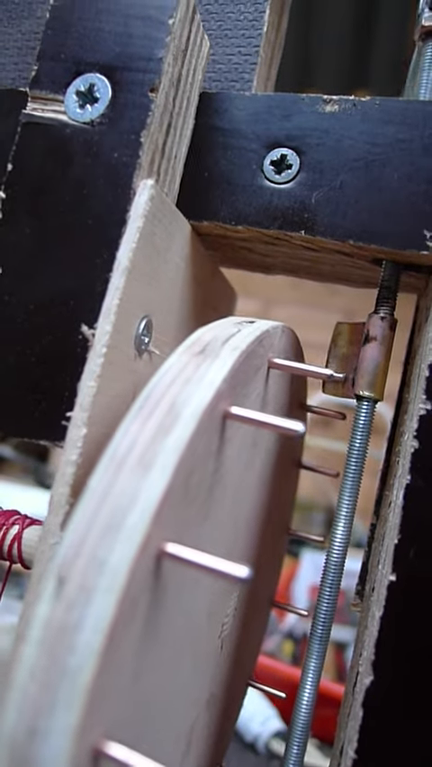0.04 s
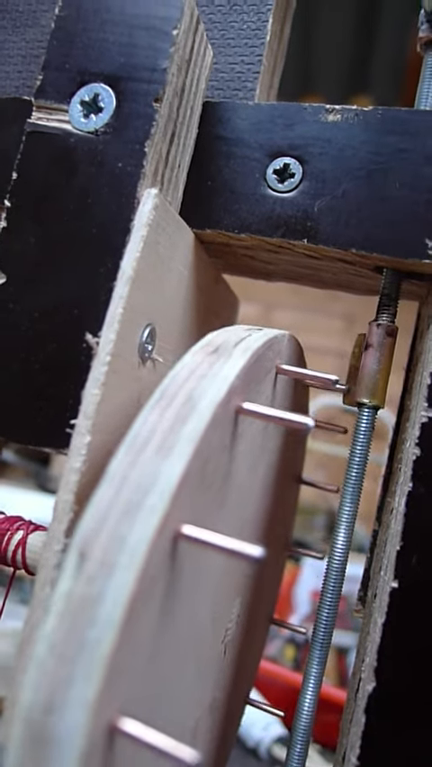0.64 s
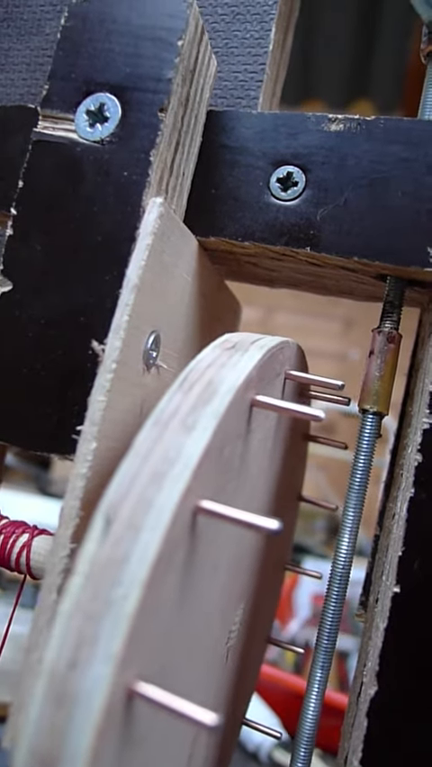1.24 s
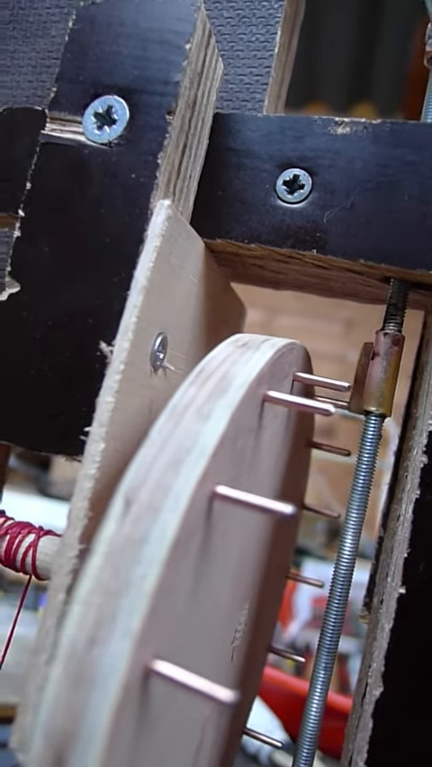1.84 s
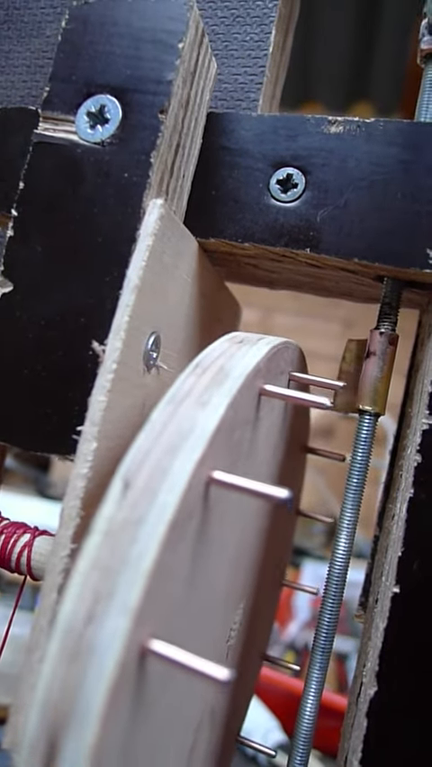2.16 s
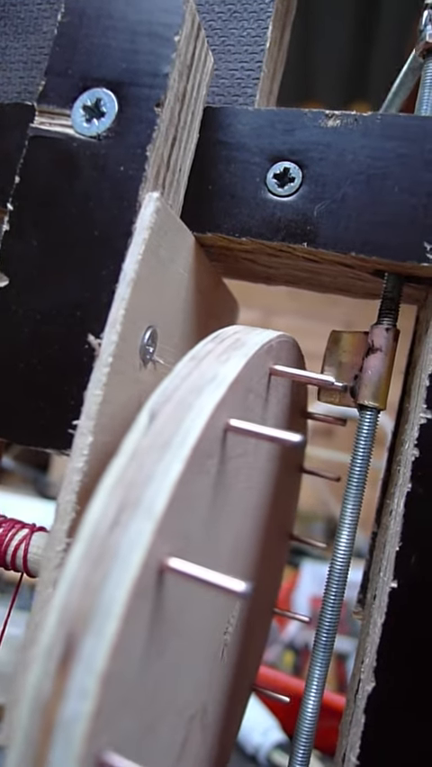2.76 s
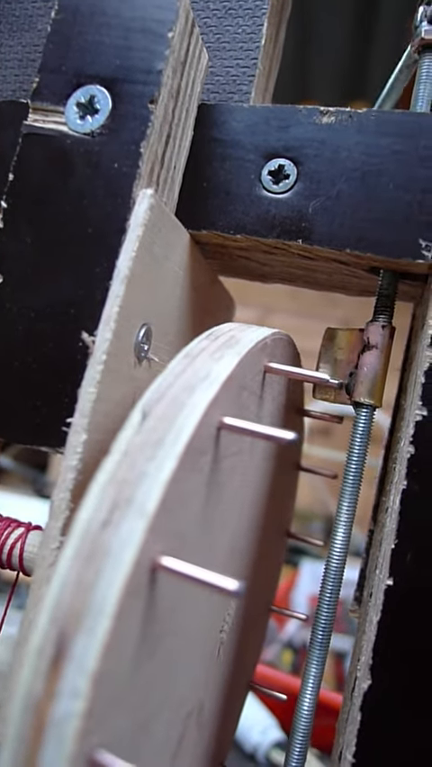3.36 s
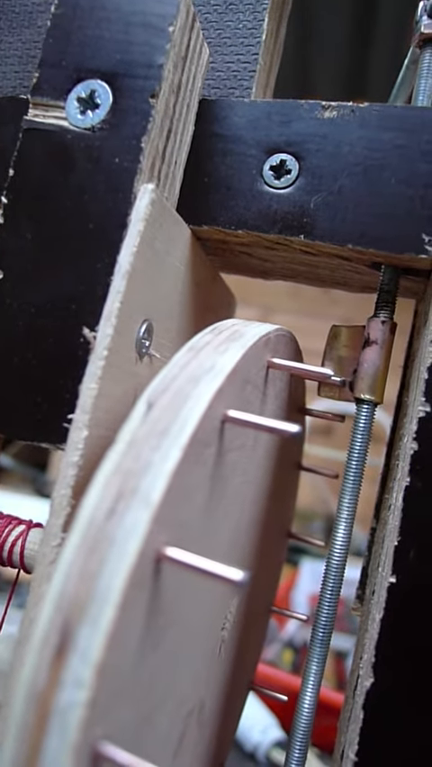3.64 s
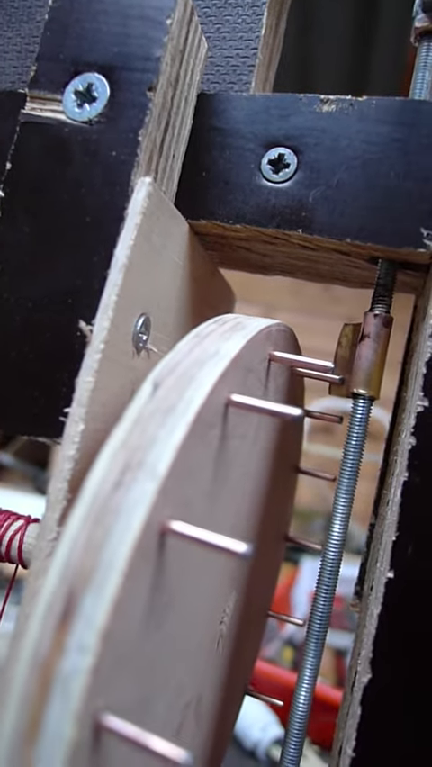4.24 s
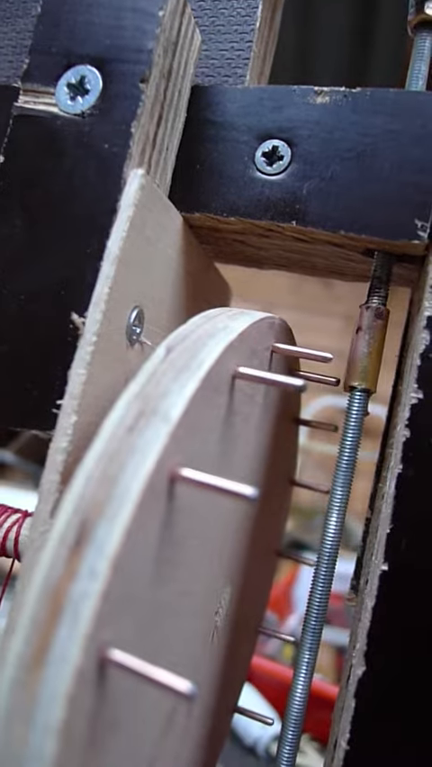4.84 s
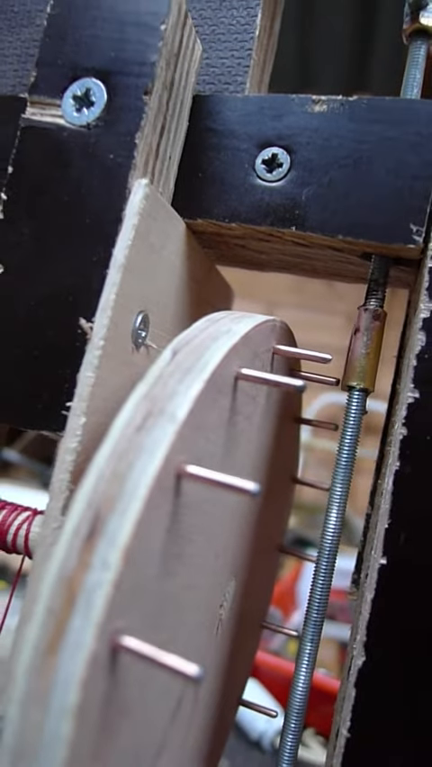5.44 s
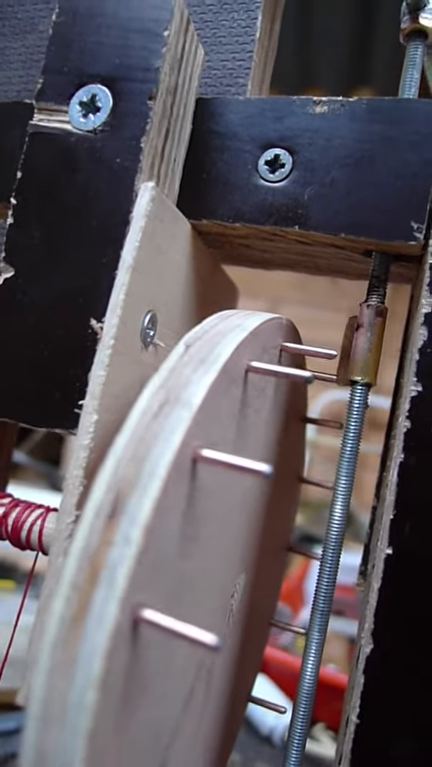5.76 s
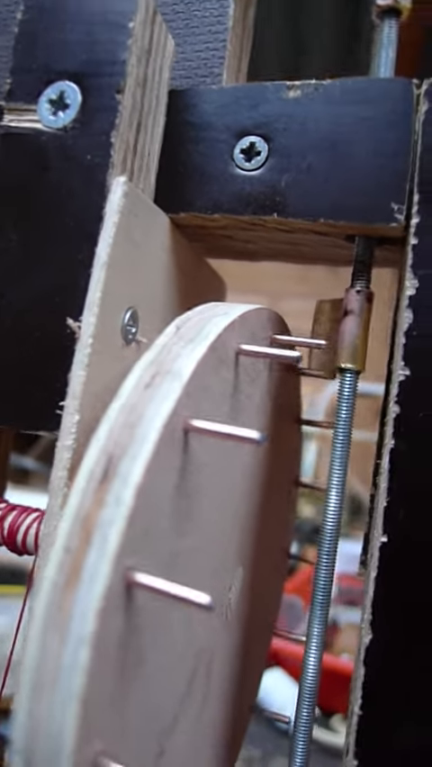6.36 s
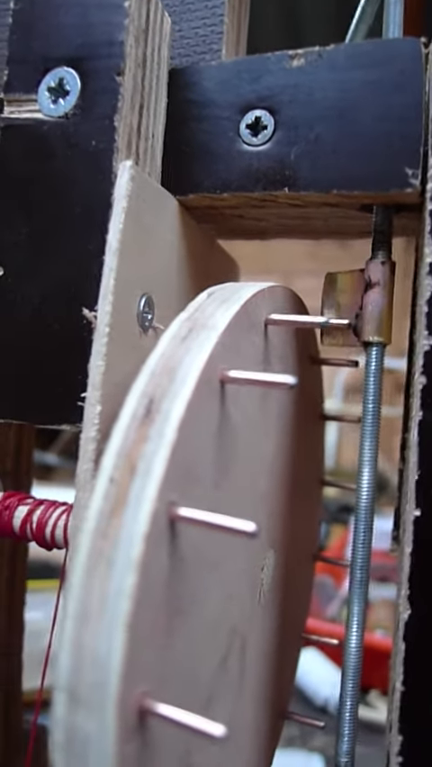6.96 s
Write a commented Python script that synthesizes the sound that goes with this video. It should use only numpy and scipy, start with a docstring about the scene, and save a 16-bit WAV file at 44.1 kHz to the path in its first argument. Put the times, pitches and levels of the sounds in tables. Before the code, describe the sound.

A homemade wooden clock mechanism ticks slowly, heard from close by in a small, quiet room. Four sharp clacks come roughly two seconds apart as steel pins on a plywood wheel strike brass catches. Each is preceded by faint creaks and a brief scrape, and mixes a short metallic ring with a wooden knock and tiny rebounds. Faint hiss lies underneath.

```python
"""Wooden pin-wheel clock

A home-made clock is heard from close by in a quiet room. On each swing a steel pin creaks on a brass
pallet by stick-slip friction, scrapes down its slope and slips off. The plywood wheel spins free for
a moment, then the next pin strikes the other pallet: a chattering clack of steel and wood modes."""
import sys
import numpy as np
from scipy import signal
from scipy.fft import rfft, irfft, next_fast_len
from scipy.io import wavfile
from scipy.ndimage import map_coordinates

SR = 44100
rng = np.random.default_rng(int(sys.argv[2]) if len(sys.argv) > 2 else 0)


def materialize(psi):
    """Save the field psi as 16-bit PCM at rate SR to the path in sys.argv[1].

    A 1-D psi becomes a single channel; in a 2-D psi each row is a channel.
    """
    bounded = np.clip(np.atleast_2d(psi).T, -1, 1)
    quanta = np.round(bounded * 32767).astype(np.int16)
    wavfile.write(sys.argv[1], SR, quanta)


N = 317961

# Spectrum of steel rubbing on brass: frequency_hz, density_db
RASP_SPECTRUM = [(300, 0.5), (1200, 0), (3500, -2), (7000, -6.5), (8300, -5), (9300, -18), (13000, -24),
                 (17000, -36)]
# A pin lands edge-on, then seats and chatters: pallet, start_s, seating_db, touch_re_seating_db,
# touch_tick_db, knock_db, first_gap_s, gap_exponent, last_contact_loss_db
PIN_LANDINGS = [("far", 0.7737, -14, -5, -3, 0, 0.0031, 1.33, 3),
                ("near", 2.5399, -15.5, -2.5, 2, -4, 0.0023, 1.42, 7.5),
                ("far", 4.7256, -14.5, -8.5, 0.5, 2, 0.0038, 0.77, 6.5),
                ("near", 6.4821, -15, -11.5, 12, -1, 0.0022, 1.29, 13)]


def amp(db):
    """Amplitude ratio of a level in decibels."""
    return 10 ** (np.asarray(db) / 20)


def unit(x):
    """Normalisation to rms 1."""
    return x / np.sqrt(np.mean(x ** 2) + 1e-20)


def along(points, hz):
    """Interpolation of (frequency_hz, value) points on a logarithmic frequency axis."""
    frequencies, values = np.transpose(points)
    return np.interp(np.log(hz + 1), np.log(frequencies + 1), values)


def filtered(x, response):
    """Linear filtering: the spectrum of x is multiplied by a frequency response."""
    size = next_fast_len(len(x) + SR // 4)
    return irfft(rfft(x, size) * response(np.fft.rfftfreq(size, 1 / SR)), size)[:len(x)]


def noise(spectrum, size):
    """Spectral shaping: white noise is given a colour, at rms 1."""
    return unit(filtered(rng.standard_normal(size), lambda hz: amp(along(spectrum, hz))))


def resonate(x, modes):
    """Forced vibration: x drives parallel resonators of alternating polarity."""
    return filtered(x, lambda hz: sum(
        (-1) ** k * amp(db) * 1j * hz * width / (centre ** 2 - hz ** 2 + 1j * hz * width)
        for k, (centre, width, db) in enumerate(modes)))


def ring(modes, t, scatter_db, attack_s):
    """Free vibration: modes struck at scattered strengths decay at rates proportional to bandwidth."""
    hz, width, db = np.transpose(modes)[:, :, None]
    size = width * amp(db + scatter_db * rng.standard_normal(hz.shape))
    waves = np.sin(2 * np.pi * (hz * t + rng.random(hz.shape))) * np.exp(-np.pi * width * t)
    return (1 - np.exp(-t / attack_s)) * np.sum(size * waves, axis=0) / np.sqrt(np.sum(size ** 2) / 2)


def add(track, start_s, sound):
    """Superposition: a sound is summed into the track."""
    part = track[round(start_s * SR):][:len(sound)]
    part += sound[:len(part)]


def in_room(x, wet_db, build_s):
    """Reverberation: a small room's diffuse field builds up, then decays, faster in the treble."""
    # Reverberation time: frequency_hz, t60_s
    decay_times = [(120, 0.38), (400, 0.39), (1000, 0.26), (3000, .29), (5500, 0.27), (9000, 0.19),
                   (15000, 0.26)]
    # Colour of the reflections: frequency_hz, level_db
    colour = [(100, 1), (500, -2), (1200, 3.5), (2700, 0.5), (4200, -0.5), (6000, -6), (12000, -4.5)]
    hz, t, field = signal.stft(rng.standard_normal(SR // 2), SR, nperseg=256)
    field = field * amp(along(colour, hz)[:, None] - 60 * t / along(decay_times, hz)[:, None])
    tail = signal.istft(field * (1 - np.exp(-t / build_s)), SR, nperseg=256)[1]
    return x + amp(wet_db) * signal.fftconvolve(x, tail / np.linalg.norm(tail))[:len(x)]


def background(hiss_db, rustle_db):
    """Ambient noise: steady room hiss, and a soft low rubbing that swells under Gaussian envelopes."""
    # Spectra of the hiss and the rubbing: frequency_hz, density_db
    hiss_spectrum = [(15, -50), (25, -27), (43, -11), (82, -4.5), (157, -2), (190, -1), (344, -3.5),
                     (384, -3), (591, -5.5), (641, -6.5), (818, -6), (887, -6), (1370, -9), (5570, -17.5),
                     (16000, -29)]
    rustle_spectrum = [(40, -35), (90, -10.5), (195, 0), (330, -8), (750, -5), (1300, -11), (3000, -17),
                       (7000, -27), (12000, -100)]
    # Swells of rubbing: middle_s, relative_peak_db, half_width_s
    rustles = [(0.23, -51.5, 0.09), (0.52, -55, 0.2), (2.2, -57, 0.26), (3.54, -53, 0.16),
               (4.28, -55.5, 0.48), (5.84, -53, 0.11), (6.24, -53, 0.08)]
    t = np.arange(N) / SR
    hiss = filtered(noise(hiss_spectrum, N), lambda hz: hz < 15900)
    swells = sum(amp(db) * np.exp(-((t - middle_s) / width_s) ** 2) for middle_s, db, width_s in rustles)
    return amp(hiss_db) * hiss + amp(rustle_db) * swells * noise(rustle_spectrum, N)


def creaks(level_db, grit_db, grit_t60_s):
    """Stick-slip friction: each gritty slip rings the resting pin as the pallet swings under it."""
    # The clearest slips: start_s, relative_level_db
    slips = [(0.132, -38), (0.179, -38.5), (0.1844, -39), (0.2004, -35.5), (0.3455, -40), (2.0167, -42.5),
             (2.0687, -45.5), (2.124, -42.5), (4.0527, -43), (4.066, -39.5), (4.091, -41.5), (4.179, -36.5),
             (4.1988, -39), (5.7828, -44.5)]
    # Modes of the resting pin: pitch_hz, bandwidth_hz, level_db
    pin_modes = [(2373, 40, 3), (2930, 80, -5.5), (3230, 33, -4), (3540, 56, 1), (3950, 65, -8),
                 (4250, 79, -3.5), (4500, 90, -4), (4910, 67, -5), (5730, 140, -8), (6800, 47, -18),
                 (7810, 100, -13), (8290, 50, -23)]
    track, t = np.zeros(N), np.arange(SR // 10) / SR
    rise_s = 0.0015
    # Three fainter slips gather at the end of each swing, ahead of the next landing.
    lead_s, spread_s, faint_db = 0.53, 0.05, -49.5
    faint_slips = [(max(landing_s - lead_s + spread_s * chance, 0), faint_db)
                   for _, landing_s, *_ in PIN_LANDINGS for chance in rng.standard_normal(3)]
    grit_envelope = amp(grit_db - 60 * t / grit_t60_s) * (1 - np.exp(-t / rise_s))
    for start_s, db in slips + faint_slips:
        grit = grit_envelope * noise(RASP_SPECTRUM, len(t))
        pin = ring(pin_modes, t, scatter_db=3, attack_s=rise_s)
        add(track, start_s, amp(db + level_db) * (pin + grit))
    return track


def wheel(level_db):
    """Axle friction drives the wooden wheel's modes as it gathers speed, until a landing stops it."""
    # Free spins: stop_s, relative_final_db, growth_db_per_s
    spins = [(0.7737, -56, 12), (2.5399, -41.5, 200), (4.7256, -45.5, 50), (6.4821, -61, 12)]
    # Modes of the wheel on its axle: pitch_hz, bandwidth_hz, level_db
    axle_modes = [(175, 50, -7.5), (320, 36, 5), (430, 110, -5), (710, 220, -12)]
    spin_s, braking_s = 0.14, 0.01
    t, turning = np.arange(N) / SR, np.zeros(N)
    for stop_s, db, growth in spins:
        gate = np.interp(t - stop_s, [-spin_s, -spin_s / 2, 0, braking_s], [0, 1, 1, 0])
        turning += amp(db - growth * np.abs(stop_s - t)) * gate
    return amp(level_db) * turning * unit(resonate(rng.standard_normal(N), axle_modes))


def slide_envelope(pallet):
    """Amplitude envelope of a pin on a pallet's slope: each stroke swells until the pin slips off."""
    # Sliding strokes: pallet, slip_off_s, relative_peak_db, length_s
    strokes = [("far", 0.732, -41.5, 0.032), ("near", 2.469, -42, 0.065), ("far", 4.688, -40, 0.026),
               ("near", 6.415, -42, 0.036)]
    swell_db, edge_db_per_s = 10, 900
    t, gain = np.arange(N) / SR, np.zeros(N)
    for side, slip_off_s, db, length_s in strokes:
        if side == pallet:
            touching = np.clip(t, slip_off_s - length_s, slip_off_s)
            remaining = (slip_off_s - touching) / length_s
            gain += amp(db - swell_db * remaining - edge_db_per_s * np.abs(t - touching))
    return gain


def scrapes(pallet, modes, level_db, rasp_db, catches_per_s, stutter_db):
    """Sliding friction: dense catches of steel on brass rasp and excite the pallet as the grip wavers."""
    grip_rate_hz = 110
    grip_points = rng.standard_normal(N * grip_rate_hz // SR + 4)
    grip = map_coordinates(grip_points, [np.arange(N) * grip_rate_hz / SR])
    catches = amp(stutter_db * grip) * rng.standard_normal(N) * (rng.random(N) < catches_per_s / SR)
    rasp = unit(filtered(catches, lambda hz: amp(along(RASP_SPECTRUM, hz))))
    ringing = unit(resonate(catches, modes))
    return amp(level_db) * slide_envelope(pallet) * (ringing + amp(rasp_db) * rasp)


def contacts(pallet):
    """Inelastic bounces: first touch, chatter and rebounds, as (start_s, level_db, knock_db, tick_db)."""
    # The wheel recoils and drops the pin back: pallet, start_s, level_db, knock_db
    rebounds = [("far", 0.7985, -26, 7), ("far", 0.8015, -28, 9), ("far", 0.8210, -36, 18),
                ("far", 0.8380, -46, 27), ("far", 0.8495, -34, 2), ("far", 0.8870, -45, 4),
                ("near", 2.5790, -36, 9), ("near", 2.5930, -29.5, -2), ("far", 4.7470, -31.5, 8),
                ("far", 4.7650, -34, -2), ("near", 6.5025, -29.5, 9), ("near", 6.5205, -25.5, -1)]
    # Tick of a seating and of a rebounding pin: pallet, tick_db
    seat_tick_db = {"far": -13, "near": -4}
    rebound_tick_db = {"far": -6, "near": -11}
    chatter_count, touch_knock_db = 3, 6
    hold_exponent = 2.5  # the higher it is, the longer the chatter keeps its strength
    hits = []
    for side, start_s, db, touch_db, tick_db, knock_db, gap_s, gap_exponent, loss_db in PIN_LANDINGS:
        if side == pallet:
            hits.append((start_s, db + touch_db, knock_db + touch_knock_db, tick_db))
            for k in range(chatter_count):
                delay_s = gap_s * (k + 1) ** gap_exponent
                spent = (k / (chatter_count - 1)) ** hold_exponent
                hits.append((start_s + delay_s, db - loss_db * spent, knock_db, seat_tick_db[pallet]))
    return hits + [(start_s, db, knock_db, rebound_tick_db[pallet])
                   for side, start_s, db, knock_db in rebounds if side == pallet]


def clacks(hits, steel_modes, frame_modes, ring_db, wood_db, frame_db, crack_db, tick_db,
           wood_t60_s, crack_t60_s, steel_wet_db, wood_wet_db):
    """Impact excitation: each contact rings steel and plywood, with a bright tick whose strength is set for
    each contact."""
    # Spectra of the edge-on tick, the plywood knock and its crack: frequency_hz, density_db
    tick_spectrum = [(1000, -17), (4000, 1.5), (8000, 7.5), (11000, -3.5), (15500, -4.5), (18000, -12)]
    wood_spectrum = [(40, -33), (80, -33), (130, -6), (240, -4.5), (380, 2), (650, -1.5), (1100, 0),
                     (1400, -16), (1800, -1), (3000, -15.5), (6000, -70)]
    crack_spectrum = [(600, -11), (1700, -4), (2700, 2), (4000, -3), (8500, -6), (10000, -17), (12500, -27),
                      (16000, -43)]
    steel, wood, t = np.zeros(N), np.zeros(N), np.arange(SR // 2) / SR
    snap = amp(-60 * t / 0.0028) + amp(-5.5 - 60 * t / 0.073)  # a spike, then a faint sizzle
    for start_s, db, knock_db, sharp_db in hits:
        metal = amp(ring_db) * ring(steel_modes, t, scatter_db=1.5, attack_s=0.00024)
        tick = amp(tick_db + sharp_db) * snap * noise(tick_spectrum, len(t))
        add(steel, start_s, amp(db) * (metal + tick))
        thud = amp(wood_db - 60 * t / wood_t60_s) * noise(wood_spectrum, len(t))
        body = amp(frame_db) * ring(frame_modes, t, scatter_db=3, attack_s=0.0018)
        crack = amp(crack_db - 60 * t / crack_t60_s) * noise(crack_spectrum, len(t))
        add(wood, start_s, amp(db) * (amp(knock_db) * (thud + body) + crack))
    # The knocks and cracks carry almost no deep bass.
    wood = signal.sosfilt(signal.butter(3, 85, "high", fs=SR, output="sos"), wood)
    # The thin steel is heard mostly as direct sound; the broad panels fill the room.
    return in_room(steel, steel_wet_db, build_s=0.0027) + in_room(wood, wood_wet_db, build_s=0.008)


def scene():
    """Escapement action: the far and near pallets take turns, and friction leads up to each clack."""
    # All mode tables: pitch_hz, bandwidth_hz, level_db
    # Modes of each pallet under a sliding pin
    far_rub = [(1230, 64, -4), (1810, 130, 1.5), (3030, 95, -7), (3354, 90, 4.5), (3550, 100, 0),
               (4460, 200, -2), (6000, 54, -6.5), (6450, 120, -8), (7110, 160, -3.5), (8050, 150, -7)]
    near_rub = [(1800, 40, 5), (1930, 35, 1.5), (2980, 210, -8), (3480, 130, -8), (4830, 110, -20),
                (5870, 50, -15), (6560, 72, -11), (8400, 170, -15), (9000, 94, -19)]
    # Modes of the struck pin, pallet and rod
    far_steel = [(1710, 60, 1), (1890, 110, -1), (1968, 39, -6.5), (2240, 42, 3.5), (2536, 240, -1),
                 (2680, 52, -9), (2890, 74, -0.5), (2974, 57, 0), (3200, 110, -2.5), (3363, 180, 1),
                 (3940, 120, -2), (4160, 160, 0.5), (4180, 90, -2), (4690, 130, -1), (5110, 60, -18),
                 (5180, 61, -36), (5600, 140, 1.5), (5800, 63, -13), (6830, 88, -6.5), (6850, 48, -18),
                 (7900, 61, -23), (8350, 50, -25), (8100, 60, -17), (8600, 84, -20), (9200, 140, -14),
                 (10600, 250, -16), (12300, 150, -24)]
    near_steel = [(1644, 77, -2), (1980, 32, -23), (2420, 23, 8), (2360, 130, 5), (2620, 66, 3.5),
                  (2980, 80, 6), (2933, 94, 11), (3066, 74, -2), (3190, 35, -10), (3360, 39, 12),
                  (3960, 30, -21), (4000, 37, -14), (4280, 230, 9), (4800, 40, -15), (4920, 33, -9),
                  (5810, 52, 7), (5880, 72, 3.5), (6660, 110, -27), (6440, 77, -22), (7800, 77, 11),
                  (7650, 33, 5), (7800, 90, -16), (7700, 35, -26.5), (8130, 110, 7), (9620, 88, -6)]
    # Low modes of the plywood frame behind each pallet
    far_frame = [(123.5, 8.8, 1.5), (196, 4.7, 0), (270, 12, -12), (368, 59, -7.5), (485, 28, -1),
                 (634, 19, 4), (697, 49, -1), (820, 22, 2), (1009, 24, -3.5), (1080, 42, 1), (1360, 24, 0)]
    near_frame = [(136, 23, 3), (214, 14, 8), (320, 19, 1), (475, 7.4, 1), (557, 19, 7.5), (1000, 30, -17),
                  (1110, 15, 1), (1324, 55, 1.5)]
    far = clacks(contacts("far"), far_steel, far_frame,
                 ring_db=3.5, wood_db=-16.5, frame_db=-22, crack_db=-6, tick_db=-0.5,
                 wood_t60_s=0.06, crack_t60_s=0.035, steel_wet_db=-15, wood_wet_db=-7.5)
    near = clacks(contacts("near"), near_steel, near_frame,
                  ring_db=2.5, wood_db=-13.5, frame_db=-21, crack_db=-6, tick_db=-6,
                  wood_t60_s=0.044, crack_t60_s=0.044, steel_wet_db=-14, wood_wet_db=-8.5)
    friction = creaks(level_db=-0.5, grit_db=-7.5, grit_t60_s=0.071)
    friction += wheel(level_db=-1.5)
    friction += scrapes("far", far_rub, level_db=-1, rasp_db=-2.5, catches_per_s=7700, stutter_db=3.5)
    friction += scrapes("near", near_rub, level_db=-1.5, rasp_db=-3.5, catches_per_s=4000, stutter_db=2.5)
    clock = far + near + in_room(friction, wet_db=-12, build_s=0.0096)
    return clock + background(hiss_db=-53.5, rustle_db=-0.5)


def record(dry):
    """Band limiting: the treble has a narrow notch, and nothing passes above the upper limit."""
    notch_hz, top_hz = 7470, 16800
    notched = signal.lfilter(*signal.iirnotch(notch_hz, Q=28, fs=SR), dry)
    return filtered(notched, lambda hz: hz < top_hz)[None]


dry = scene()
out = record(dry)
materialize(out)
```